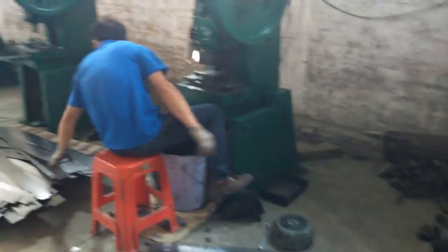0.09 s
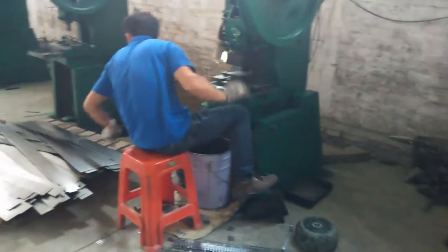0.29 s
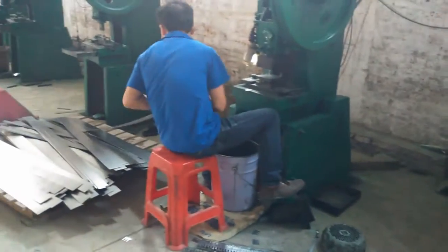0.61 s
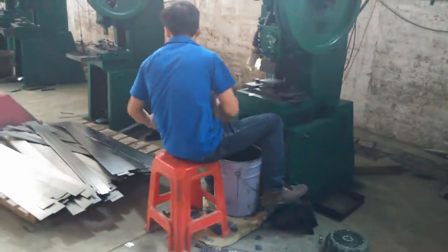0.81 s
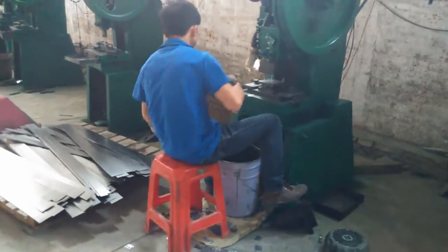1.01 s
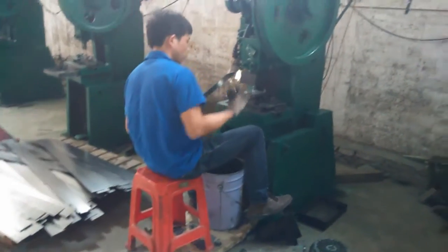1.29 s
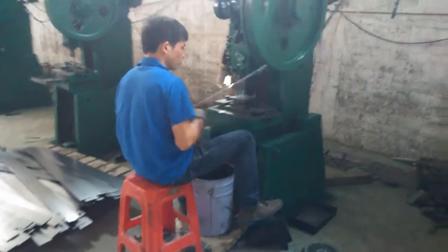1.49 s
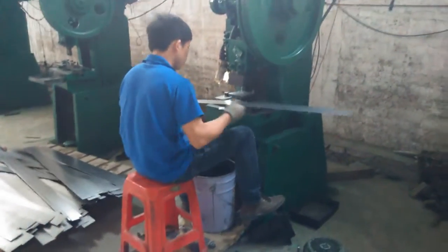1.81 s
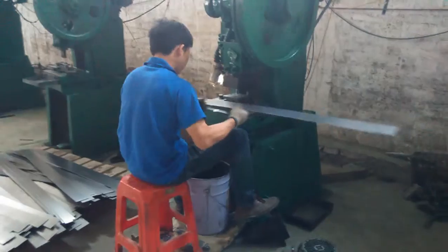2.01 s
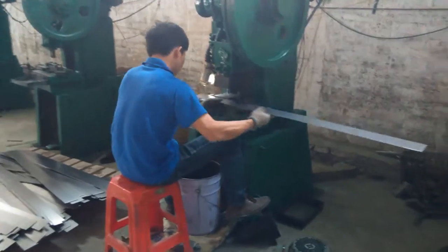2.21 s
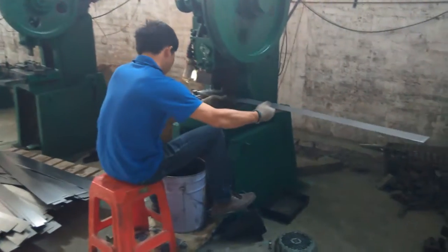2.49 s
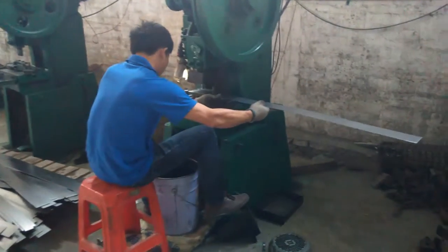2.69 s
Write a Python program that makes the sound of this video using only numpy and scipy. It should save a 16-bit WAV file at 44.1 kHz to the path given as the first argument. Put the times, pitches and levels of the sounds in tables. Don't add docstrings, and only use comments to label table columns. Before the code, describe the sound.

Metal strip dragged over steel with shrill ringing, sheet crashes and heavy booming clanks in a hall

```python
import sys
import numpy as np
from scipy import signal
from scipy.fft import rfft, irfft
from scipy.io import wavfile
from scipy.ndimage import uniform_filter1d

SR = 44100
rng = np.random.default_rng(int(sys.argv[2]) if len(sys.argv) > 2 else 0)


def wav_record(signal):
    frames = np.transpose(np.atleast_2d(signal))
    bounded = np.clip(frames, -1, 1)
    quanta = np.round(bounded * 32767).astype(np.int16)
    wavfile.write(sys.argv[1], SR, quanta)


def rack_gain(trim_db):
    fader = np.asarray(trim_db, float)
    return 10 ** (fader / 20)


N = 125685
T = np.arange(N) / SR
ALIKE_HZ = 615
LOW_PAN_DB = 3.5


def unit(x):
    return x / np.sqrt(np.mean(x ** 2))


def sides(left_over_right_db):
    gains = rack_gain(np.array([[.5], [-.5]]) * left_over_right_db * np.ones(N))
    return 2 * gains / gains.sum(axis=0)


def colour(x, tone):
    hz, db = np.array(tone).T
    log_hz = np.log(np.fft.rfftfreq(N, 1 / SR) + 1)
    gain = rack_gain(np.interp(log_hz, np.log(hz), db, -60, -60))
    return unit(irfft(rfft(x) * gain, N))


def wide():
    f = np.fft.rfftfreq(N, 1 / SR)
    mid, side = rfft(rng.standard_normal((2, N)))
    alike = 0.93 / (1 + (f / ALIKE_HZ) ** 2)
    left_right = np.array([[1], [-1]])
    return irfft(mid * np.sqrt(1 + alike) + left_right * side * np.sqrt(1 - alike), N)


def walk(rate_hz):
    hold = int(SR / rate_hz)
    stairs = np.repeat(rng.standard_normal(N // hold + 1), hold)
    return unit(uniform_filter1d(uniform_filter1d(stairs, hold), hold)[:N])


def fade(start_s, rise_s, t60_s):
    since = np.maximum(T - start_s, 0)
    return (1 - np.exp(-since / rise_s)) * np.exp(-np.log(1000) * since / t60_s)


def ring(x, hz, t60_s):
    pole = np.exp(2j * np.pi * hz / SR - np.log(1000) / (t60_s * SR))
    return signal.lfilter([1], [1, -pole], x).imag


def slips(lo_hz, hi_hz, t60_s, count):
    slips_per_s = 50
    out = 0
    for hz in np.linspace(lo_hz, hi_hz, count) * (1 + 0.0097 * rng.standard_normal(count)):
        jolts = 1.0 * (rng.random((2, N)) < slips_per_s / SR)
        out = out + ring(jolts, hz, t60_s)
    return unit(out)


# pitch_hz, level_db [dB per Hz]
SHOP_TONE = [(30, -35), (95, -22), (135, -4.5), (243, -5), (450, -2.5), (864, 0.5), (1130, -2.5),
             (1220, -17)]
# pitch_hz, level_db [dB per Hz]
HISS_TONE = [(1000, -44), (1300, -4), (2100, -2), (3400, -10), (6200, -9), (8500, 3), (11300, -9.5),
             (16000, -20)]
# pitch_hz, level_db [dB rms]
CASINGS = [(242.7, -47), (607.3, -52), (679, -47), (863, -47), (737.5, -51), (903, -47.5), (988, -50),
           (1102, -52.5)]


def shop():
    shop_db, motor_db, hiss_level_db = -37, -45.5, -38.5
    motor_hz = 133.5
    hum = rack_gain(shop_db + 1.0 * walk(4.15)) * colour(wide(), SHOP_TONE)
    hum = hum + sum(rack_gain(db) * unit(ring(wide(), hz, t60_s=0.15)) for hz, db in CASINGS)
    throb = unit(ring(wide(), motor_hz, t60_s=0.14))
    motor = rack_gain(motor_db) * unit(np.sin(2 * np.pi * motor_hz * T) + throb)
    hiss = rack_gain(hiss_level_db) * colour(wide(), HISS_TONE) * sides(3.5)
    return (hum + motor) * sides(LOW_PAN_DB) + hiss


# start_s, level_db, pitch_hz, length_s
MOANS = [
    (1.424, -26, 803, 0.07),
    (2.26, -32.5, 808, 0.26),
    (2.354, -30.5, 406, 0.04),
]


def moans():
    out = 0
    for start_s, db, hz, length_s in MOANS:
        swell = np.sin(np.pi * np.clip((T - start_s) / length_s, 0, 1)) ** .5
        level = rack_gain(db + 2.5 * walk(39.17))
        out = out + level * swell * np.sin(2 * np.pi * hz * T + 0.47 * walk(25))
    return out


# start_s, level_db, thud_hz, thud_db [added to level_db]
BANGS = [(1.106, -12.5, 244, -14), (1.128, -11, 198, -5), (1.2, -30, 288, 0), (1.423, -12.5, 648, -16),
         (1.481, -4.5, 354, -11), (1.158, -13, 360, -20), (1.288, -29.5, 196, 8), (1.49, 2, 360, -1),
         (1.505, -5, 368, 3.5), (1.521, -18, 330, 5), (1.565, -16, 360, 3), (1.54, -6, 368, -4),
         (1.593, -12, 325, 7), (1.644, -10, 368, 5.5), (1.671, -16.5, 325, 9.5), (1.744, -5.5, 318, -3),
         (1.821, -13.5, 337, 4.5), (1.866, -10.5, 318, -1.5), (1.926, -9, 345, -1.5), (2, -10, 328, -2.5),
         (2.068, -33, 296, -3), (2.137, -19.5, 347, -11), (2.209, -20, 482, 2.5)]
# pitch_hz, level_db
FRAME = [(168, -7), (251, -18), (320, -5.5), (361, -2.5), (410, -3.5), (505, -4), (585, -10.5), (652, -4),
         (690, -5.5), (808, -5.5), (904, -9.5)]
# pitch_hz, level_db [dB per Hz]
BOOM_TONE = [(40, -61), (110, -10.5), (165, -4), (230, -7), (340, 2.5), (650, -4), (1000, -7.5),
             (3000, -29)]


def bangs():
    frame_db, frame_scatter_db, boom_db = -14.0, 2.5, -15.5
    out, boom_power = 0, 0
    chance = rng.standard_normal((len(BANGS), len(FRAME), 3))
    for (start_s, db, thud_hz, thud_db), blow in zip(BANGS, chance):
        since = T - start_s
        boom_power = boom_power + (rack_gain(db) * fade(start_s, 0.019, t60_s=1.44)) ** 2
        thud = fade(start_s, 0.0047, t60_s=0.075) * np.sin(2 * np.pi * thud_hz * since)
        out = out + rack_gain(db + thud_db) * thud
        frame_fade = fade(start_s, 0.0056, t60_s=0.19)
        for (hz, mode_db), (loudness, detune, ear) in zip(FRAME, blow):
            ear_phase = np.array([[0], [ear * hz / ALIKE_HZ]])
            phase = 2 * np.pi * hz * (1 + 0.017 * detune) * since + ear_phase + 6 * detune
            level_db = db + mode_db + frame_db + frame_scatter_db * loudness
            out = out + rack_gain(level_db) * frame_fade * np.sin(phase)
    boom = rack_gain(boom_db + 2 * walk(30.15)) * np.sqrt(boom_power) * colour(wide(), BOOM_TONE)
    return out + boom


# start_s, level_db, t60_s, left_over_right_db, big_low_panels_db
CRASHES = [(1.097, -28.5, .5, 5, 5.5), (.787, -23.5, .06, 16, -20), (1.125, -20, .5, 5, -1),
           (1.11, -24, 0.98, 12, -6), (1.153, -14.5, 0.85, 6, 0), (1.375, -9.5, 0.15, 7.5, -7),
           (1.393, -16, 1, 4.5, -2.5), (1.486, -20, 0.95, 2.5, 10), (1.534, -23, 1, 5, 9),
           (1.775, -20.5, 0.23, 12, 3), (1.797, -21.5, 1, 5, 9), (1.891, -16, 0.35, 16, -12),
           (1.93, -20, 0.85, 3, -13.5), (2.001, -17.5, 0.4, 8.5, 1), (2.08, -26.5, 1, 5, -21),
           (2.235, -36, 0.32, 12, -15), (2.804, -34, 0.36, 26, -5)]
# pitch_hz, level_db [dB per Hz]
CRASH_TONE = [(530, -17), (900, -14), (2090, -11.5), (3910, -13), (5410, -7), (6110, -10.5), (9090, -2),
              (10900, -8), (16000, -49)]


def crashes():
    panel_hz = 2960
    rattle = slips(1213, 7500, t60_s=0.046, count=56)
    x = colour(rattle + 1.42 * rng.standard_normal((2, N)), CRASH_TONE)
    low = signal.sosfiltfilt(signal.butter(2, panel_hz, fs=SR, output="sos"), x)
    small_power, big_power = 0, 0
    for start_s, db, t60_s, pan_db, panels_db in CRASHES:
        power = (rack_gain(db) * fade(start_s, 0.0068, t60_s) * sides(pan_db)) ** 2
        small_power = small_power + power
        big_power = big_power + power * rack_gain(2 * panels_db)
    return (x - low) * np.sqrt(small_power) + low * np.sqrt(big_power)


# start_s, level_db, pitch_hz, t60_s
PINGS = [(.216, -22, 10520, 0.17), (.236, -10, 10432, 0.13), (.396, -18, 8070, .1), (.418, -16, 8100, 0.15),
         (.46, -15, 8500, 0.13), (.786, -14, 14700, 0.052), (.786, -25, 14300, .04), (.77, -24, 9770, 0.23),
         (1.096, -29, 11100, 0.071), (1.852, -24, 12700, .15), (1.885, -30, 13600, .25),
         (2.0, -30, 14300, 0.33), (2.472, -29, 14550, .12), (1.793, -17.5, 1838, 0.13),
         (1.385, -23, 14900, .15), (1.46, -17, 8465, 0.28), (1.5, -22, 9860, 0.18), (1.15, -27, 1654, 0.22),
         (1.81, -20, 6500, 0.094), (2.085, -24, 7500, 0.088), (2.1, -25, 9400, .3), (.325, -50, 10440, .25),
         (0.786, -7.5, 10970, 0.07), (.785, -32, 9700, 0.32), (1.391, -13, 8320, 0.33),
         (1.392, -24, 10560, 0.099), (1.392, -17, 11230, 0.2), (1.771, -7, 6550, 0.026),
         (1.851, -5.5, 11000, 0.066), (1.87, -19, 9220, 0.41), (1.95, -19, 10576, 0.41),
         (1.87, -24, 10800, 0.4), (2.005, -21.5, 8060, 0.17), (2.059, -17.5, 10700, 0.17),
         (2.237, -19.5, 8590, 0.22), (2.468, -20, 9320, 0.32), (2.478, -17.5, 10400, 0.21),
         (2.555, -25, 10630, 0.26)]


def pings():
    out = 0
    for start_s, db, hz, t60_s in PINGS:
        rough = unit(ring(rng.standard_normal(N), hz, t60_s=0.084))
        tone = np.sin(2 * np.pi * hz * T) + 0.55 * rough
        out = out + rack_gain(db) * fade(start_s, 0.01, t60_s) * tone
    return sides(33) * out


# pitch_hz, level_db [dB per Hz]
DRAG_TONE = [(2500, -27), (4400, -28), (5300, -21), (7300, -7), (9600, 3.5), (11300, -2), (12300, -7.5),
             (16000, -9)]
# start_s, level_db, left_over_right_db, tilt_db [towards the top modes]
PULL = [
    (0.0, -46.5, 26, 12.5),
    (0.29, -31, 14, -2.5),
    (0.385, -27, 1.5, -7.5),
    (0.42, -27, 1.5, -10),
    (0.52, -22, 1, -8),
    (0.615, -15, 0.5, -9),
    (0.75, -20, 4.5, -6),
    (0.9, -24, 2.5, -8),
    (1.09, -29.5, 3, -8),
]
# start_s, level_db, left_over_right_db, tilt_db [towards the top modes]
FEED = [(1.105, -19, 2.4, 0.038), (1.157, -15.5, 2.3, 0), (1.367, -32.5, 14, 0), (1.401, -22, 29, 0),
        (1.725, -29.5, 15.5, 0), (1.84, -28, 21, 0), (1.915, -22.5, 15.5, 0), (2.2, -30, 14.6, 0),
        (2.449, -33, 15, 0), (2.479, -28.5, 9.5, 0), (2.85, -35.5, 20, 0)]
# start_s, level_db, t60_s
JERKS = [(.395, -22.5, 0.27), (0.57, -22, 0.31), (.68, -16, 0.46), (.787, -22, 0.063), (0.924, -17.5, 0.55),
         (.965, -17, 0.3), (1.393, -25, 0.16), (1.5, -23, 0.37), (1.81, -18, 0.14), (1.853, -21, .3),
         (1.93, -20.5, .25), (2.005, -26, 0.23), (2.065, -26, .3), (2.238, -23, 0.33)]


def drag():
    hiss_db, tilt_hz = 4.5, 9400
    start_s, db, pan_db, tilt_db = np.array(list(PULL) + list(FEED)).T
    singing = slips(5000, 13000, t60_s=0.071, count=48)
    x = colour(singing + rack_gain(hiss_db) * rng.standard_normal((2, N)), DRAG_TONE)
    low = signal.sosfiltfilt(signal.butter(1, tilt_hz, fs=SR, output="sos"), x)
    tilt = rack_gain(np.interp(T, start_s, tilt_db))
    power = rack_gain(np.interp(T, start_s, db)) ** 2
    for jerk_s, jerk_db, t60_s in JERKS:
        power = power + (rack_gain(jerk_db) * fade(jerk_s, 0.0066, t60_s)) ** 2
    return (low / tilt + (x - low) * tilt) * np.sqrt(power) * sides(np.interp(T, start_s, pan_db))


def scene():
    low_sources = (bangs() + moans()) * sides(LOW_PAN_DB)
    return shop() + low_sources + crashes() + pings() + drag()


# low_hz, high_hz
GATED_HZ = [(2900, 7000), (12100, 16000)]


def gate(x):
    f, _, z = signal.stft(x, SR, nperseg=1024)
    power = np.abs(z[0]) ** 2 + np.abs(z[1]) ** 2
    patch = uniform_filter1d(uniform_filter1d(power, size=6, axis=0), size=3, axis=1)
    around = uniform_filter1d(uniform_filter1d(power, size=24, axis=0), size=3, axis=1)
    in_range = sum((f > lo) & (f < hi) for lo, hi in GATED_HZ)[:, None]
    weak = in_range * (patch < around * rack_gain(2 * -1.2))
    mute = uniform_filter1d(1. * weak, size=3, axis=0).clip(0, .5) * 2
    return signal.istft(z * (1 - mute), SR, nperseg=1024)[1][:, :N]


def band_limit(x):
    return signal.sosfilt(signal.butter(12, 15800, fs=SR, output="sos"), x)


def record(dry):
    shadow_hz, drive = 6500, 1.1
    right = signal.lfilter(*signal.butter(1, shadow_hz, fs=SR), dry[1])
    x = np.array([dry[0], right])
    mix = gate(np.tanh(drive * x) / drive)
    return band_limit(mix)


dry = scene()
out = record(dry)
wav_record(out)
```